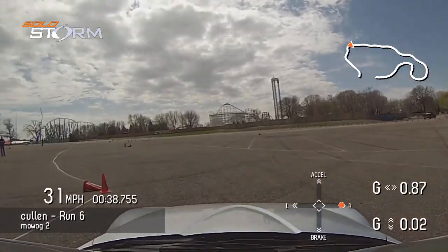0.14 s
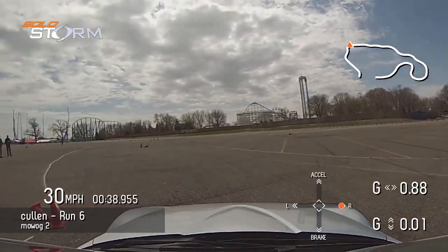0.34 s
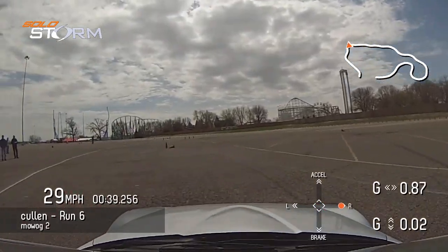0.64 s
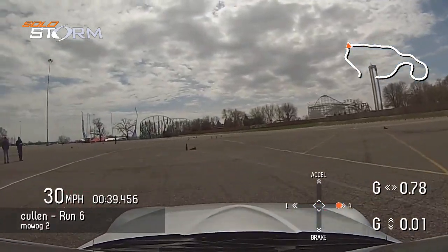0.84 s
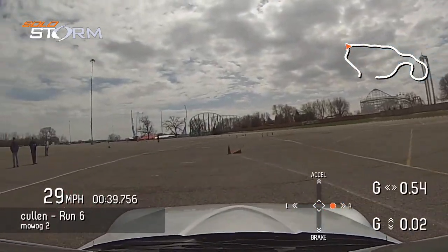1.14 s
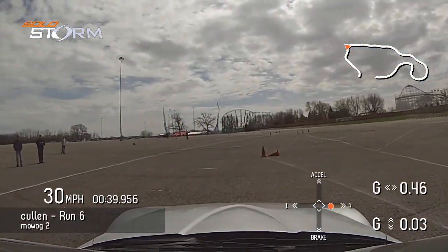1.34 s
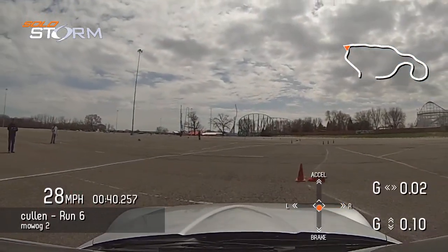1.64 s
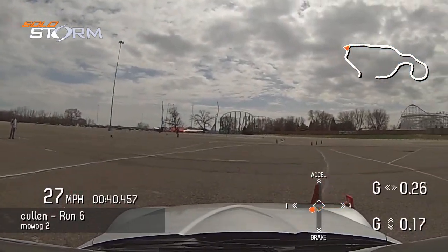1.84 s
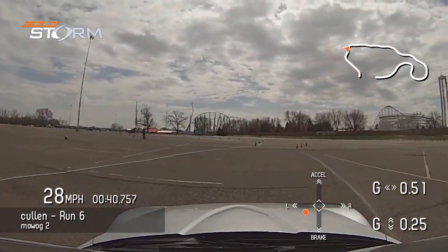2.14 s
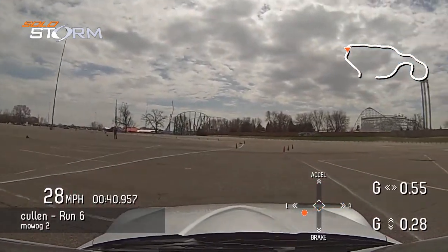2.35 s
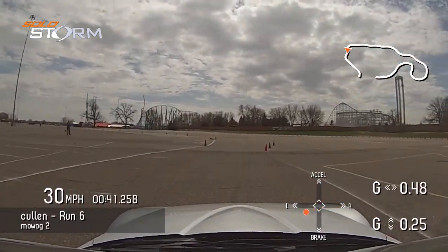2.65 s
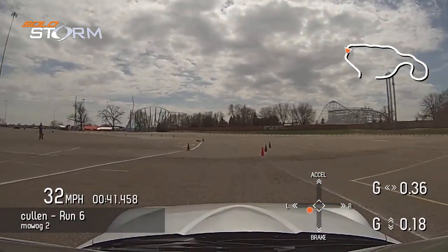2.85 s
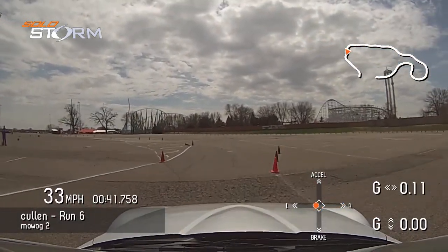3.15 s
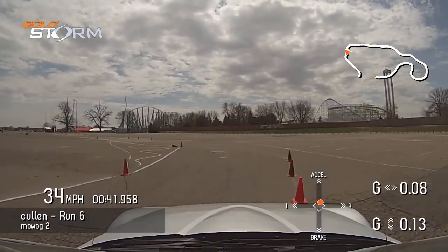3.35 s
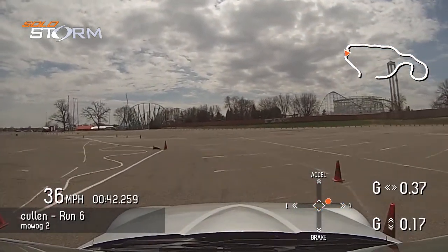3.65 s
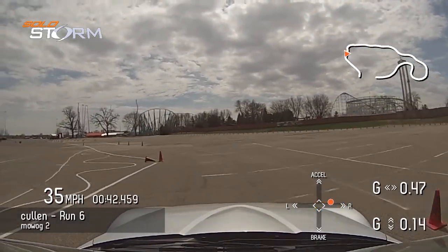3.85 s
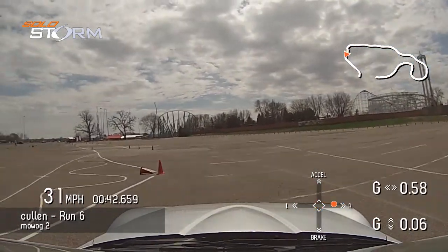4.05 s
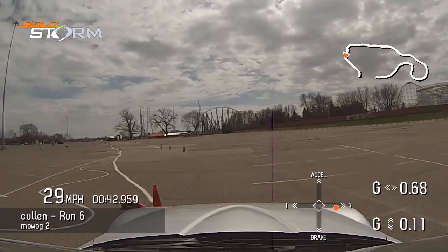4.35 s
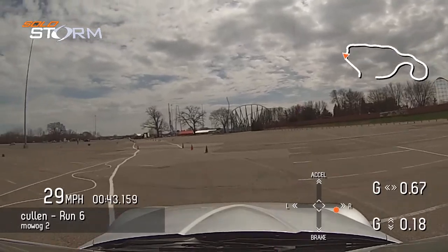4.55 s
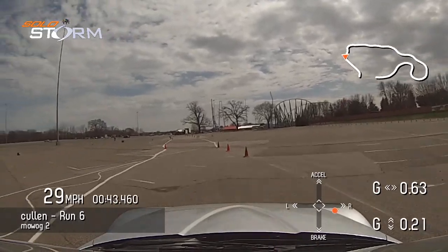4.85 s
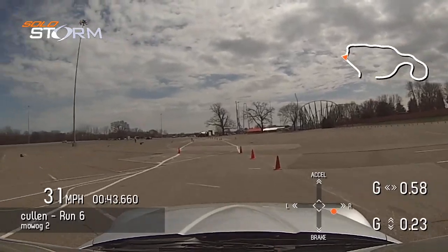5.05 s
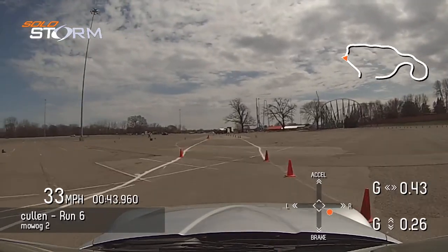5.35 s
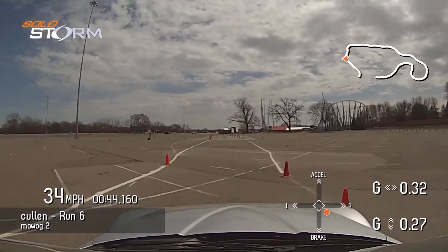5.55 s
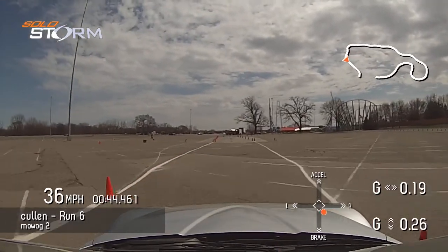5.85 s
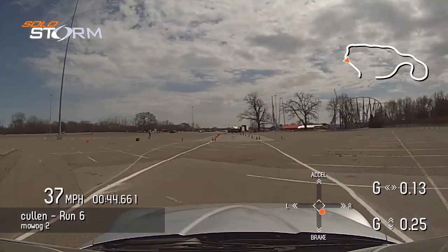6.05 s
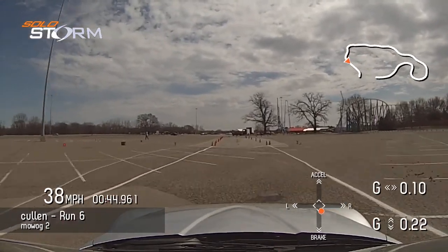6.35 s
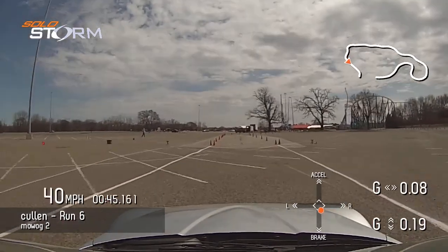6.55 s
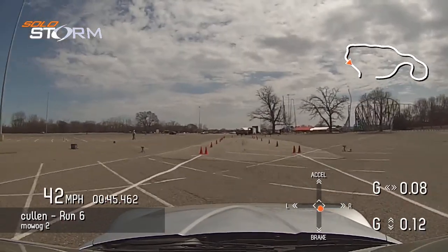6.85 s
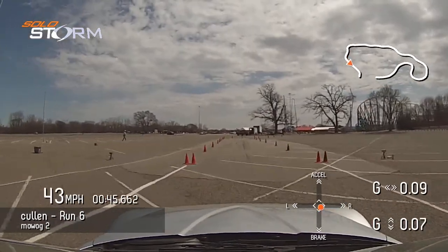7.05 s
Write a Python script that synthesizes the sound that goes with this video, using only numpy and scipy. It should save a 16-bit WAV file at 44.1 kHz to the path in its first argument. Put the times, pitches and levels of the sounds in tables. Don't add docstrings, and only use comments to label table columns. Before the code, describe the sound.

A close, muffled microphone in a sealed housing rides on a sports car's roof across a rough paved lot. From 0 to 1.1 seconds, low rumble and panel boom carry clusters of dull knocks, with a soft engine hum and little wind. It eases around 1.2 to 1.8 seconds as the engine note sinks. From 1.9 to 3.1, breathy whistling puffs, plastic ticks and creaks gather, with heavy bangs near 2.7 to 3.0. The engine lifts, then a hard hollow blow rings the panel at 3.65. A calmer stretch follows until thumps at 4.4 to 4.6 and a rapid bout around 5.0 to 5.2. After that the engine climbs steadily and wind roar and hiss swell unevenly, with knocks near 5.95, 6.2, 6.8 and 7.2. The hardest jolts sound squashed, and the wind is strongest at the end.

```python
import sys
import numpy as np
from scipy import signal
from scipy.fft import rfft, irfft
from scipy.io import wavfile
from scipy.ndimage import uniform_filter1d

SR = 44100
rng = np.random.default_rng(int(sys.argv[2]) if len(sys.argv) > 2 else 0)


def int16_out(signal):
    q = np.round(np.clip(np.atleast_2d(signal).T, -1, 1) * 32767)
    wavfile.write(sys.argv[1], SR, q.astype(np.int16))


def field_ratio(decibels):
    return 10 ** (np.asarray(decibels, dtype=float) / 20)


N = 317520
HZ = np.fft.rfftfreq(N, 1 / SR)

# pitch_hz, width_hz, level_db
DRUM = [(184.8, 27, -7), (211.9, 21, 3), (235.3, 3.3, -1)]
# pitch_hz, width_hz, level_db
RIB = [(282, 16, 0), (332, 55, -11)]


def unit(x):
    return x / np.sqrt(np.mean(x ** 2))


def read(table):
    s, *columns = np.transpose(table)
    return [np.interp(np.arange(N) / SR, s, c) for c in columns]


def ring(modes):
    total = 0
    for hz, width_hz, db in modes:
        total = total + field_ratio(db) / (1 + 1j * (HZ ** 2 - hz ** 2) / (width_hz * (HZ + 1e-9))) ** 2
    return total


def through(x, response):
    return irfft(rfft(x) * response, N)


def resonant_noise(modes):
    return unit(through(rng.standard_normal(N), ring(modes)))


def walk(rate_hz):
    k = int(SR / rate_hz)
    held = np.repeat(rng.standard_normal(N // k + 1), k)
    return unit(uniform_filter1d(uniform_filter1d(held, k), k)[:N])


def even(x, span_s, share):
    k = int(span_s * SR)
    swell = np.sqrt(uniform_filter1d(uniform_filter1d(x ** 2, k), k) + 1e-3)
    return unit(x / swell ** np.clip(share, 0, 1))


def humps(centre_s, height, length_s):
    t = np.arange(0, N, 64) / SR
    distance = (t - centre_s[:, None]) / np.maximum(length_s, .01)[:, None]
    bells = np.exp(-(2 * distance) ** 2)
    return np.interp(np.arange(N) / SR, t, height @ bells)


def burst(chance, lo_hz, hi_hz, rise_s, fall_s):
    t = np.arange(len(chance)) / SR
    band = signal.butter(3, [lo_hz, hi_hz], "bandpass", fs=SR, output="sos")
    puff = signal.sosfilt(band, chance * (1 - np.exp(-t / rise_s)) * np.exp(-t / fall_s))
    return puff / np.abs(puff).max()


def pop(phase):
    clack_hz, clack_s = 520, .0013
    t = np.arange(800) / SR - 2 * clack_s
    return np.exp(-(t / clack_s) ** 2) * np.cos(2 * np.pi * clack_hz * t + phase)


def place(out, s, sound):
    start = int(s * SR)
    out[start:start + len(sound)] += sound


def airflow():
    # time_s, hiss_db
    air = [(0, -59), (.5, -59), (1.0, -56.5), (1.5, -57), (1.95, -52), (2.36, -51), (2.69, -54),
           (3.05, -59), (3.22, -52), (3.47, -52), (3.66, -61.5), (4.4, -55), (5.1, -47.5), (5.55, -44.5),
           (5.96, -39.5), (6.45, -43), (6.62, -39), (7.2, -36)]
    # centre_s, lift_db, length_s
    gusts = [(.42, 4, 0.083), (1.126, -6, 0.047), (1.694, 4, 0.063), (1.872, 2, 0.027), (1.997, 1, 0.089),
             (2.255, 2, 0.054), (2.345, 1.5, 0.04), (2.878, 5, 0.021), (3.342, 6, 0.025), (3.415, -3, 0.11),
             (3.658, 10, 0.052), (4.545, 3, 0.068), (4.73, -4, 0.24), (5.163, -3.5, 0.071),
             (5.3, 2.5, 0.18), (5.473, 3, 0.2), (5.654, -4, 0.065), (5.778, 3, 0.033), (5.911, 6, 0.019),
             (6.036, 4.5, 0.052), (6.21, 3.5, 0.032), (6.282, -4, 0.062), (6.39, -5, 0.028),
             (6.432, 4.5, 0.045), (6.582, 3.5, 0.069), (6.67, -4, 0.072), (6.844, -3.5, 0.16),
             (7.022, 5, 0.022), (7.035, -8, 0.017), (7.07, 0.5, 0.053)]
    # time_s, depth_db
    ducks = [(.575, -2), (1.04, -5), (2.75, -7.5), (2.91, 0.5), (3.675, -5), (4.61, -2.5), (5.135, -4),
             (6.14, -2)]
    recover_s = 0.44
    t, (air_db,) = np.arange(N) / SR, read(air)
    duck_db = sum(db * (t > s) * np.exp(-np.abs(t - s) / recover_s) for s, db in ducks)
    hiss_db = air_db + uniform_filter1d(duck_db, int(.03 * SR))
    roar_db = 1.025 * (hiss_db + 50) - 50 + 16 + humps(*np.transpose(gusts))
    return roar_db, hiss_db


def wind():
    # pitch_hz, level_db (per Hz)
    housing = [(350, -15), (700, -12), (1000, -11.5), (1250, -0.5), (1800, -2.5), (2300, -2.5), (2750, -12),
               (3800, -18.5), (4050, -22), (6500, -26.5), (8000, -32.5), (10000, -41.5), (11900, -42),
               (12500, -46), (14700, -54.5), (15150, -60), (15400, -78)]
    # pitch_hz, width_hz, lift_db
    cavity = [(1320, 130, 2.5), (2346, 180, 2), (2140, 180, -0.5), (3270, 500, -1.5), (3850, 160, 5.5),
              (4140, 270, -2.5), (4940, 150, 4), (5450, 200, 1.5), (5760, 140, -5), (6760, 250, 1.5),
              (7300, 300, -2), (7760, 300, 2.5), (8350, 350, -3), (9100, 300, 3)]
    # pitch_hz, width_hz, level_db (against the roar), unsteadiness_db
    whistles = [(1273, 170, -14.5, 2), (1635, 330, -17.5, 4.5), (2287, 170, -15, 2.5),
                (3845, 180, -29.5, 4.5)]
    # centre_s, lift_db, length_s
    puffs = [(1.69, 4, .06), (1.87, 4, .04), (1.98, 14, 0.043), (2.04, 9, .05), (2.11, 5, .02),
             (2.25, 12, 0.073), (2.35, 9, .04), (2.54, 5, .04), (3.06, 13, .04), (3.15, 13, .03),
             (3.344, 14, 0.055), (3.5, 9, .04), (2.6, 8, .03), (.82, 6, .07), (.54, 4, .04),
             (5.3, 7.5, 0.17), (1.04, 7, .04), (2.72, 5, .03), (2.885, 6, .02), (3.57, 8, .03),
             (5.365, 7, .04), (6.4, -5, .9)]
    roar_db, hiss_db = airflow()
    at = np.log(HZ + 1e-9)
    housing_hz, housing_db = np.transpose(housing)
    colour = field_ratio(np.interp(at, np.log(housing_hz), housing_db, left=-120))
    colour = colour * field_ratio(sum(db / (1 + (2 * (HZ - hz) / width) ** 2) for hz, width, db in cavity))
    air = rfft(unit(through(rng.standard_normal(N), colour)))
    flutter, near, out = walk(45), walk(40), 0
    for hz in 350 * 2 ** np.arange(0, 6, .5):
        band = np.cos(np.pi / 2 * np.clip((at - np.log(hz)) / np.log(2) * 2, -1, 1)) ** 2
        near = 0.95 * near + 0.15 * walk(14)
        smooth = np.clip(np.abs(np.log2(hz / 1700)) / 1.49, 0, 1)
        speed_db = smooth * (hiss_db + 19.5) + (1 - smooth) * roar_db
        top_db = 0.24 * max(np.log2(hz / 6000), 0) * (hiss_db + 43.0)
        low_db = -.12 * (hz < 1100) * (hiss_db + 47)
        waver_db = 0.48 * flutter + (1.04 - smooth) * near
        out = out + field_ratio(speed_db + top_db + low_db + waver_db) * irfft(air * band, N)
    puff_db = humps(*np.transpose(puffs))
    for hz, width_hz, db, unsteady_db in whistles:
        level_db = roar_db + db + unsteady_db * walk(9.9)
        if hz == whistles[0][0]:
            level_db = level_db + puff_db
        out = out + field_ratio(level_db) * resonant_noise([(hz, width_hz, 0)])
    return out


def engine():
    # time_s, shaft_hz, load_db
    revs = [(0, 74, -32), (1, 71, -39.5), (1.8, 65, -42), (2.4, 69, -20), (2.9, 70, -44), (3.4, 80, -31),
            (3.9, 72, -36), (4.4, 71, -23), (5.05, 73, -36.5), (5.5, 80, -34), (5.9, 88, -21),
            (6.3, 92, -35), (6.7, 98, -17.5), (7.0, 103, -28), (7.08, 104.5, -15.5), (7.2, 105.5, -16.5)]
    # multiple (of the shaft speed), level_db
    orders = [(1, -8.5), (2, -4), (3, -12), (4, -9.5), (6, -4.5)]
    shaft_hz, load_db = read(revs)
    turn = 2 * np.pi * np.cumsum(shaft_hz * (1 + 0.00774 * walk(13))) / SR
    hum = sum(field_ratio(db + 1.1 * walk(7.7)) * np.sin(k * turn) for k, db in orders)
    panel = np.abs(ring(DRUM)) + 0.49 * np.abs(ring(RIB)) + 0.47 / (1 + (HZ / 260) ** 4)
    return field_ratio(load_db) * through(hum, panel)


def shake():
    # centre_s, boom_db, length_s, sharpness_db (drum above the boom)
    bumps = [(0.079, -10.5, 0.17, -7), (0.312, -16, 0.059, -12.5), (0.451, -9.5, 0.12, -3.5),
             (.68, -21, 0.18, -9), (0.865, -18.5, 0.16, -5), (1.03, -16, 0.17, -3),
             (1.336, -20.5, 0.12, -27), (1.62, -27, 0.07, -16), (1.886, -27.5, 0.13, 4.5),
             (2.039, -17, 0.24, -16), (2.28, -18.5, 0.22, -9.5), (2.389, -16.5, 0.097, -16),
             (2.565, -13.5, 0.11, -19.5), (2.716, -4.5, 0.088, -9.5), (2.883, -20.5, 0.051, 6.5),
             (2.99, -16.5, 0.14, -8.5), (3.33, -22.5, 0.066, -31), (3.489, -12.5, 0.082, -15),
             (3.656, -13, 0.045, -11.5), (3.715, -21.5, 0.14, -17), (4.415, -17, 0.12, -11),
             (4.623, -10, 0.065, -4.5), (4.946, -18.5, 0.061, -25), (5.109, -20.5, 0.22, -1.5),
             (5.552, -24, 0.14, -7), (5.96, -15.5, 0.072, -6.5), (6.184, -19.5, 0.25, -5),
             (6.58, -24, .12, -15), (2.46, -21, 0.074, -10), (6.382, -17, 0.1, -7), (6.785, -18, 0.32, -11),
             (7.138, -23, 0.3, -5)]
    # centre_s, sway_db, length_s
    swings = [(0.103, -19, 0.46), (0.274, -16, 0.18), (0.535, -14, 0.13), (0.685, -17.5, 0.14),
              (0.89, -23, 0.35), (1.164, -15.5, 0.25), (1.36, -18, 0.097), (1.59, -20.5, 0.15),
              (1.955, -12.5, 0.16), (2.195, -18.5, 0.17), (2.396, -9.5, 0.083), (2.572, -12.5, 0.17),
              (2.715, -14.5, 0.15), (2.887, -14.5, 0.15), (3.098, -21.5, 0.11), (3.28, -33.5, 0.13),
              (3.557, -14.5, 0.078), (3.76, -18, 0.19), (3.93, -37, 0.46), (4.286, -18.5, 0.11),
              (4.427, -14.5, 0.067), (4.575, -10.5, 0.083), (4.662, -10, 0.039), (4.923, -20.5, 0.24),
              (5.113, -8.5, 0.07), (5.454, -24, 0.23), (5.817, -18.5, 0.16), (6.015, -12.5, 0.06),
              (6.177, -16, 0.26), (6.79, -21.5, 0.25)]
    s, boom_db, length_s, sharp_db = np.transpose(bumps)
    at, sway_db, span_s = np.transpose(swings)
    drum_swell = humps(s, field_ratio(boom_db + sharp_db), 0.89 * length_s)
    sway = field_ratio(-24.5) + humps(at, field_ratio(sway_db), span_s)
    boom = field_ratio(-27.5) + humps(s, field_ratio(boom_db), length_s)
    drum = field_ratio(-37.5) + drum_swell
    buzz = field_ratio(-44.5) + field_ratio(-19) * drum_swell
    return 20 * np.log10((sway, boom, drum, buzz))


def road(contact):
    # pitch_hz, width_hz, level_db
    mount = [(35.5, 8, 0), (27, 14, -9)]
    # pitch_hz, width_hz, level_db
    boom_modes = [(80, 24, -5.5), (96.4, 21.5, 3.5), (122.7, 20.2, 1.5), (155.9, 30, -8.5)]
    # pitch_hz, width_hz, level_db
    buzz_modes = [(555, 280, 3), (789, 170, -3)]
    stones = rng.standard_normal(N) * (rng.random(N) < 150 / SR)
    jolts = unit(stones * field_ratio(2.43 * rng.exponential(size=N))) + 0.62 * rng.standard_normal(N)
    sway_db, boom_db, drum_db, buzz_db = shake()
    sway = even(resonant_noise(mount), 0.047, 0.91)
    boom = even(unit(through(jolts, ring(boom_modes))), 0.095, 0.88)
    drum = even(unit(through(jolts, ring(DRUM))), 0.11, 1.0)
    buzz = even(unit(through(jolts, ring(buzz_modes))), 0.019, 0.63)
    held = field_ratio(-8 * uniform_filter1d(contact, int(.012 * SR)))
    panel = held * (field_ratio(boom_db) * boom + field_ratio(drum_db) * drum)
    panel = through(panel, 1 / (1 + (HZ / 258) ** 12))
    rib = field_ratio(0.6 * drum_db - 24.5) * even(unit(through(jolts, ring(RIB))), 0.079, 0.93)
    return field_ratio(sway_db) * sway + panel + rib + held * field_ratio(buzz_db - 8.5) * buzz


def bounces():
    # time_s, clack_db (peak), thump_db (peak)
    singles = [(.149, -42, -3), (.3136, -39, -2), (.6987, -44, -2.5), (2.5576, -37, -9), (2.902, -37, 0),
               (4.4038, -37.5, -1.5), (5.0244, -38, -3), (5.143, -49, 1.5), (5.95, -30, -3),
               (6.2605, -48, -1.5), (6.3604, -38, -3), (6.9082, -36, -0.5)]
    # first_s, last_s, count, clack_db (peak), thump_db (peak)
    runs = [(.0277, .1006, 6, -38, -3), (.1101, .1376, 3, -40, -4), (.4175, .479, 6, -38, -4),
            (.8656, .8948, 2, -42, -4), (.9777, 1.0044, 3, -38, -1.5), (1.0322, 1.0622, 2, -33, -3.5),
            (2.358, 2.4249, 2, -40, -5), (2.6881, 2.743, 5, -33, -2), (2.774, 2.8046, 2, -40, -1.5),
            (2.9849, 3.0173, 2, -30, -.5), (3.469, 3.4917, 2, -41, -4), (3.6387, 3.6707, 4, -35, -1),
            (4.6101, 4.6387, 3, -30, 0), (5.0514, 5.079, 3, -36, -1.5), (6.1792, 6.2053, 2, -30, -3),
            (6.775, 6.7958, 3, -35, -5), (7.1892, 7.1976, 2, -28, -6)]
    soft_db, scatter_db = -13, 2
    rows = list(singles)
    chances = rng.standard_normal((len(runs), 8))
    for (first, last, count, clack_db, thump_db), luck in zip(runs, chances):
        for k, s in enumerate(np.linspace(first, last, round(count))):
            rows.append((s, clack_db + soft_db * (k % 2 == 0), thump_db + scatter_db * luck[k]))
    return np.transpose(rows)


def knocks():
    # time_s, peak_db
    touches = [(.963, -29), (1.011, -38), (1.040, -27), (1.068, -30), (1.094, -33), (1.118, -34),
               (2.964, -38), (2.982, -28), (2.910, -31), (2.770, -31), (.017, -40), (1.027, -30),
               (1.863, -40), (2.41, -29), (2.851, -40), (2.868, -38), (2.884, -28.5), (2.937, -37),
               (4.391, -42), (4.415, -34), (4.588, -31), (4.97, -41)]
    # time_s, thump_db (peak)
    pushes = [(.967, -3.5), (1.0447, -6), (1.0721, -6), (1.109, -5.5), (2.0095, -6), (2.4137, -8),
              (2.8736, -4), (2.9312, -5), (4.4185, -7), (4.609, -2), (4.6527, -5.5), (4.944, -8),
              (5.039, -8), (5.066, -6), (5.093, -7), (5.108, -5), (5.123, -4), (5.206, -5), (5.54, -5),
              (5.972, -5), (6.1, -3.5), (6.165, -2), (7.102, -9), (7.177, -7)]
    # time_s, peak_db
    clanks = [
        (3.636, -30),
        (2.5, -46),
        (2.9, -43),
    ]
    clack_lead_s = .0045
    s, clack_db, thump_db = bounces()
    push_s, push_db = np.transpose(pushes)
    blows = np.zeros(N)
    blows[(s * SR).astype(int)] = field_ratio(thump_db - 3.0)
    blows[(push_s * SR).astype(int)] += field_ratio(push_db - 3.0)
    phase = np.arange(-600, 601) / SR * np.pi * 135
    push = signal.fftconvolve(blows, (2 * phase ** 2 - 1) * np.exp(-phase ** 2), "same")
    push = through(push, 1 / (1 + (HZ / 250) ** 10))
    out = np.zeros(N + 800)
    hits = [(a - clack_lead_s, b) for a, b in zip(s, clack_db)] + list(touches)
    for (at, db), a in zip(hits, rng.standard_normal((len(hits), 800))):
        body = burst(a, 441, 718, 0.00048, 0.0021) + .35 * burst(a, 617, 950, .0006, .002)
        edge = .16 * burst(a, 900, 1600, .0005, .0015) + .08 * burst(a, 900, 6000, .0001, .0007)
        place(out, at, field_ratio(db + 1) * (.45 * body + pop(np.pi * a[0]) + edge))
    for (at, db), a in zip(clanks, rng.standard_normal((len(clanks), 5000))):
        ringing = burst(a, 870, 1200, 0.0026, 0.037) + 0.28 * burst(a, 1100, 1800, 0.00055, .003)
        place(out, at, field_ratio(db) * ringing)
    contact = signal.fftconvolve(blows > 0, np.hanning(int(0.017 * SR)), "same")
    return push + out[:N], np.clip(contact, 0, 1)


def raps():
    # time_s, peak_db, edge_db (bright part)
    hard = [(0.037, -22, -4), (0.067, -29, -3), (0.095, -24, -6), (0.12, -27, -2), (0.172, -34, -6),
            (0.383, -40, 1), (0.425, -27, -4), (0.4495, -26, -5), (0.4741, -21.5, -5), (0.503, -36, -4),
            (0.986, -29, -6), (1.0115, -23, -3), (1.859, -30, -2), (2.722, -28, -4), (2.868, -29, -4),
            (2.898, -23, -8), (2.964, -23.5, -6), (3.012, -38, -6), (3.6445, -24.5, 3), (4.612, -29, -4),
            (5.121, -37, -6), (.264, -35, -9), (.466, -35, -9), (.701, -35, -9), (1.719, -31, -9),
            (1.87, -33, -9), (2.691, -30, -9), (2.75, -30, -9), (2.992, -29, -9), (3.63, -34, -6),
            (3.659, -31, -4), (3.742, -34.5, -9), (4.761, -32, -9), (5.06, -25, -9), (5.19, -34, -9)]
    # time_s, peak_db
    thuds = [(1.87, -29), (2.725, -21.5), (2.769, -33), (3.644, -30), (3.74, -30.5), (4.149, -36),
             (4.241, -32), (2.9, -30), (2.982, -29), (6.096, -27), (1.0, -30), (5.945, -30)]
    out = np.zeros(N + 3000)
    for (s, db, edge_db), a in zip(hard, rng.standard_normal((len(hard), 800))):
        rap = pop(np.pi * a[0]) + 0.22 * burst(a, 550, 1060, .0005, 0.0035)
        rap = rap + field_ratio(edge_db) * burst(a, 850, 1900, .0006, 0.0015)
        place(out, s, field_ratio(db) * rap / np.abs(rap).max())
    for (s, db), a in zip(thuds, rng.standard_normal((len(thuds), 3000))):
        place(out, s, field_ratio(db) * burst(a, 243, 359, 0.0018, .014))
    return out[:N]


def seam():
    # centre_s, level_db, length_s
    sizzle = [(3.65, -79.5, .22), (.25, -92, .25), (1.24, -92, .15), (1.55, -87, .08), (2.87, -84, .06),
              (3.82, -92, .1)]
    s, db, length_s = np.transpose(sizzle)
    return humps(s, field_ratio(db), length_s) * resonant_noise([(14500, 2600, 0)])


def rattle():
    # time_s, peak_db, body_db (tap level)
    ticks = [(0.4404, -52.5, 6), (0.4673, -52, 6), (0.4733, -55, 6), (0.5482, -53, 6), (0.56, -53.5, 6),
             (0.6355, -55, 6), (0.6684, -55, 6), (0.7018, -54, 6), (1.0036, -49, 6), (1.0345, -49, 6),
             (1.1378, -56.5, 6), (1.3823, -67, 6), (1.3823, -59, 6), (1.5863, -62, 6), (1.7624, -54.5, 6),
             (1.9006, -53, 6), (1.9126, -47, 6), (1.941, -48, 4), (2.2486, -43, 8), (2.364, -50, 6),
             (2.4044, -50, 6), (2.4369, -51, 6), (2.4478, -47, 6), (2.5192, -53, 6), (2.5656, -56, 6),
             (2.5755, -52, 6), (2.6204, -50, 4), (2.6524, -49, 6), (2.7242, -65, 6), (2.7242, -44, 6),
             (2.8085, -56, 6), (2.8275, -60, 6), (2.8753, -52, 6), (2.9098, -56, 6), (2.9223, -48, 6),
             (2.9392, -57, 6), (2.9577, -57, 6), (2.9856, -54, 6), (3.0021, -51, 6), (3.0659, -55.5, 6),
             (3.1148, -55, 6), (3.4635, -48, 4), (3.6476, -56, 6), (3.6671, -55, 6), (3.8626, -61, 6),
             (4.6119, -51, 8), (4.6309, -49.5, 6), (5.1452, -50, 6)]
    out, busy = np.zeros(N + 400), np.zeros(N)
    for (s, db, body_db), (a, b) in zip(ticks, rng.standard_normal((len(ticks), 2, 400))):
        tap = field_ratio(min(body_db, 10) - 10.5) * burst(b, 2500, 7800, 0.00025, 0.0006)
        place(out, s, field_ratio(db - 1.5) * (burst(a, 8900, 11600, .0003, .001) + tap))
        busy[int(s * SR)] = field_ratio(db)
    busy = uniform_filter1d(busy, int(.07 * SR)) * 0.049 * SR
    chatter = busy * rng.standard_normal(N) * (rng.random(N) < 170 / SR)
    scraps = signal.fftconvolve(chatter, np.hanning(50))[:N] * rng.standard_normal(N)
    return out[:N] + field_ratio(-7) * through(scraps, ring([(10200, 2800, 0)]))


def snaps():
    # time_s, peak_db
    creaks = [(3.645, -42), (3.667, -45), (.4404, -43), (.7018, -46), (1.8447, -45), (2.9392, -46),
              (5.143, -38), (2.684, -44), (0.482, -41), (0.5611, -36), (1.003, -38), (1.0316, -43.5),
              (2.7324, -45), (2.7423, -37), (2.7737, -39), (2.7804, -44), (2.8104, -42), (2.8746, -39),
              (2.8862, -41), (2.8993, -47), (2.9174, -48), (2.985, -38), (2.993, -45), (3.017, -38),
              (3.0254, -42), (3.6703, -43.5)]
    out = np.zeros(N + 400)
    for (s, db), (a, b) in zip(creaks, rng.standard_normal((len(creaks), 2, 400))):
        snap = burst(a, 1500, 7500, .0001, 0.00056) + field_ratio(-12.5) * burst(b, 7000, 12800, .0001, .0005)
        place(out, s, field_ratio(db) * snap)
    return out[:N]


def rings():
    # time_s, pitch_hz, peak_db, hold_s
    notes_struck = [(3.638, 226, -11, 0.039), (1.858, 226.7, -20, 0.028), (1.858, 285, -32, 0.074),
                    (7.05, 210, -22, .14), (3.728, 305, -26.5, 0.0075), (.635, 215, -22, 0.024),
                    (1.1, 215, -21, 0.027), (5.052, 217, -12.5, .02), (4.637, 216, -16, .015),
                    (6.094, 219, -16, .012), (5.76, 215, -24.5, 0.014)]
    # time_s, peak_db
    pings = [(.495, -55), (1.947, -52), (1.983, -55), (1.989, -52), (1.997, -54), (2.262, -52),
             (2.313, -53), (2.533, -51), (2.538, -52), (2.683, -52), (2.694, -51), (2.993, -54)]
    rise_s, fall_s = .006, 0.015
    age, out = np.arange(SR // 3) / SR, np.zeros(N + SR)
    for s, hz, db, hold_s in notes_struck:
        shape = (1 - np.exp(-age / rise_s)) * np.exp(-np.maximum(age - hold_s, 0) / fall_s)
        place(out, s, field_ratio(db) * shape * np.sin(2 * np.pi * hz * age))
    for (s, db), a in zip(pings, rng.standard_normal((len(pings), 400))):
        place(out, s, field_ratio(db) * burst(a, 9000, 11500, .0003, .0009))
    return out[:N]


def scene():
    knock, contact = knocks()
    struck = knock + rattle() + snaps() + raps() + rings()
    return (road(contact) + engine() + wind() + seam() + struck)[None]


def gated(x):
    # edge_hz, quiet_db (may shut below this), share (of quiet blocks shut, 0-1)
    gates = [(12500, -85, .3), (14300, -85, .55)]
    block = 2048
    for (edge_hz, quiet_db, share), luck in zip(gates, rng.random((len(gates), N // block + 1))):
        top = through(x, 1 / (1 + (edge_hz / (HZ + 1)) ** 80))
        quiet = uniform_filter1d(top ** 2, 4096)[::block] < field_ratio(2 * quiet_db)
        shut = np.repeat(quiet & (luck < share), block)[:N]
        x = x - top * uniform_filter1d(1. * shut, 300)
    return x


def low_pass(x):
    return signal.sosfilt(signal.butter(12, 15700, fs=SR, output="sos"), x)


def record(dry):
    top = np.where(dry > 0, .84, .92)
    squeezed = dry / (1 + np.abs(dry / top) ** 6) ** (1 / 6)
    squeezed = dry + through((squeezed - dry)[0], 1 / (1 + (HZ / 390) ** 8))
    mix = gated(squeezed[0])[None]
    return low_pass(mix)


dry = scene()
out = record(dry)
int16_out(out)
```